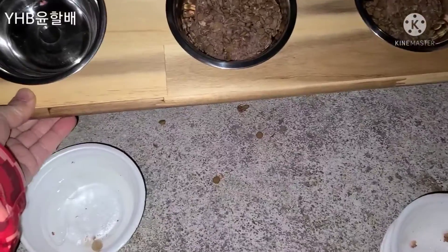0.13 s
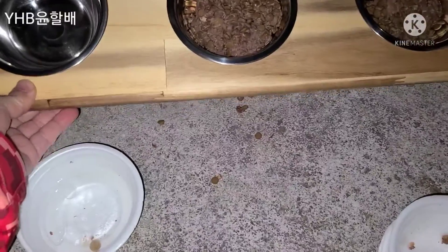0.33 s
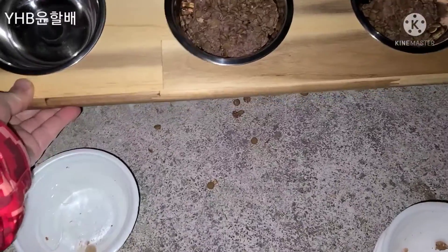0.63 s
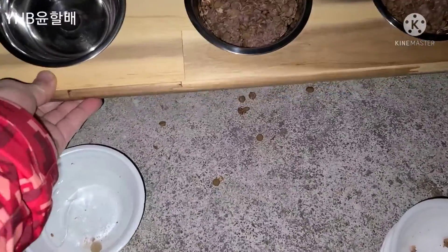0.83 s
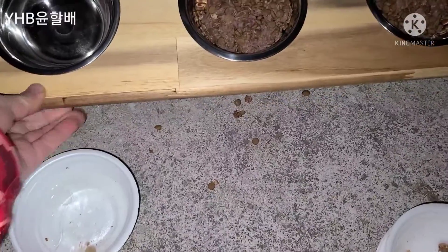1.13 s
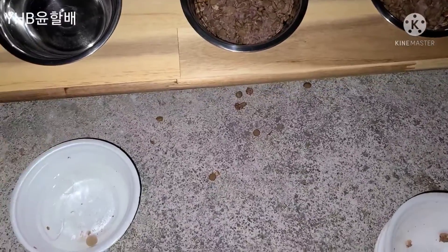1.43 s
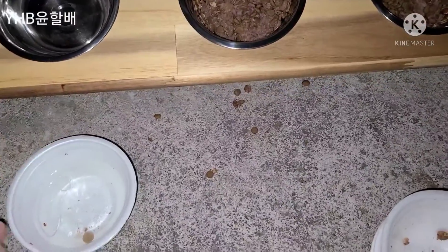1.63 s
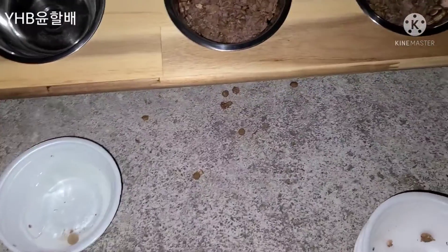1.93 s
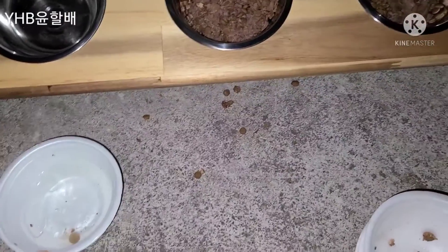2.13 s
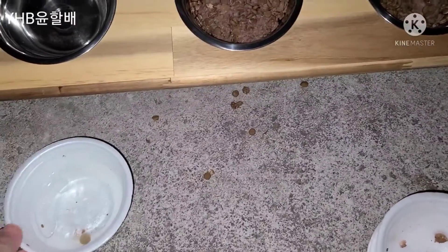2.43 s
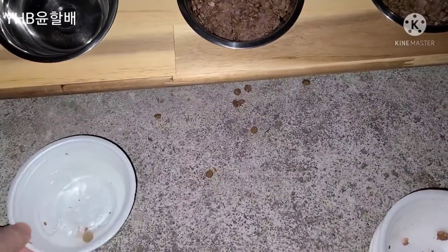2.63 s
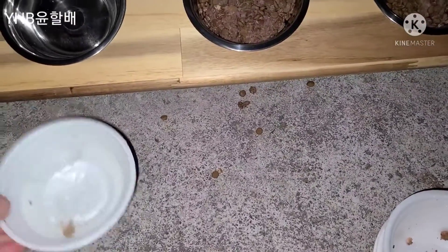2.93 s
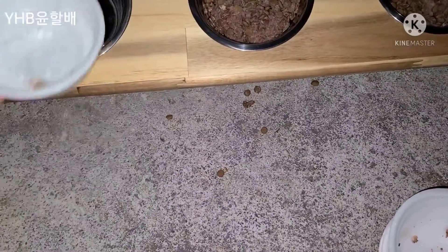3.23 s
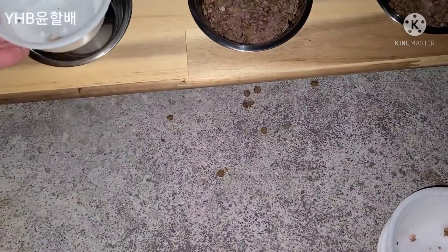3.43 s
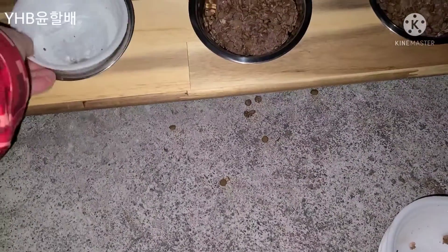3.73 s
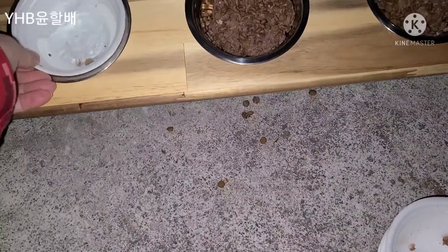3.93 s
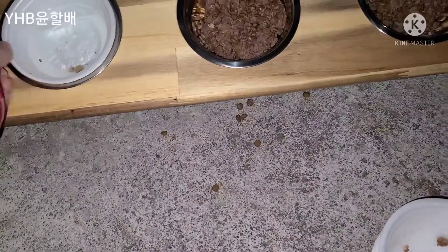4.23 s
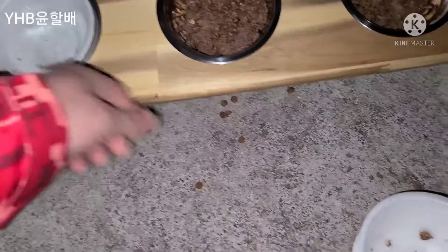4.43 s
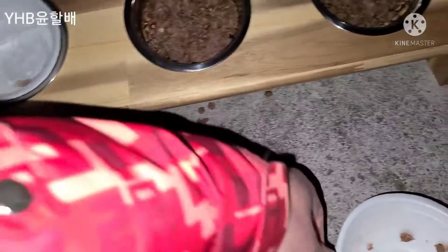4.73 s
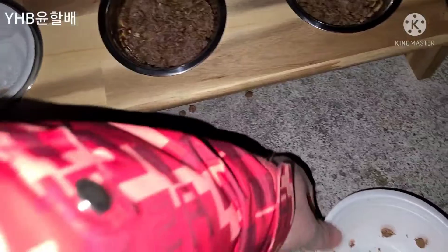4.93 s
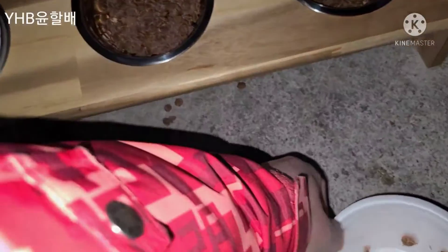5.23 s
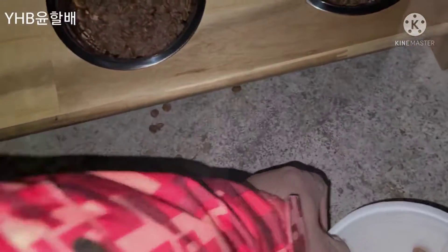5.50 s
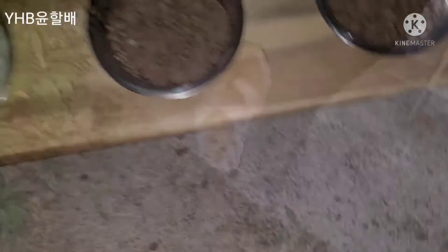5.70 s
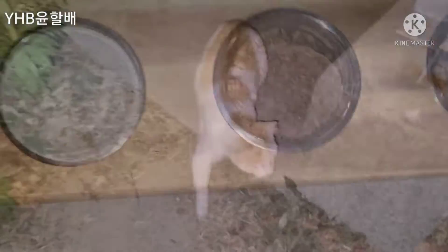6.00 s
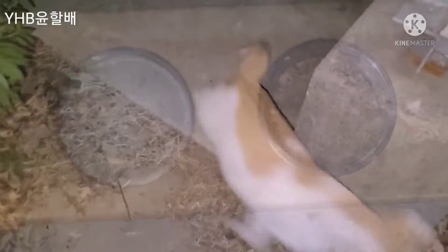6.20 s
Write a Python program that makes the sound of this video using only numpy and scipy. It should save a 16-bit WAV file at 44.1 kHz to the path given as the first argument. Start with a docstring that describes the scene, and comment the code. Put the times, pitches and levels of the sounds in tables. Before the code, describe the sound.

Close up outdoors at night, a wooden bowl stand is dragged in uneven jerks over gritty concrete, hollow and grating, loudest near one second, with a last short knock. After a lull, plastic bowls rub faintly, one taps, then bowls scuff together while being stacked. A nylon sleeve swishes broadly, followed by crisp plastic clacks and small rubs. Far low rumble and light wind buffeting lie underneath, stereo and dry.

```python
"""A wooden bowl stand is dragged in jerks over concrete, outdoors at night, close to a two-port microphone.
Light plastic bowls are then scuffed, stacked and tapped, and a nylon sleeve swishes as the arm reaches.
Far rumble and light wind lie underneath. Rubbing is made of random clicks sent through filters, knocks of
short decaying bursts, singing parts of narrow noise bands, and the night and wind of filtered noise."""
import sys
import numpy as np
from scipy import signal
from scipy.fft import rfft, irfft, next_fast_len
from scipy.io import wavfile
from scipy.ndimage import uniform_filter1d

SR = 44100
rng = np.random.default_rng(int(sys.argv[2]) if len(sys.argv) > 2 else 0)


def generate_wav(sig):
    """Save sig (samples, or channels by samples) to the path in sys.argv[1] as 16-bit PCM at SR."""
    pcm = np.round(np.clip(np.atleast_2d(sig).T, -1, 1) * 32767).astype(np.int16)
    wavfile.write(sys.argv[1], SR, pcm)


N = 280463  # length in samples
T = np.arange(N) / SR  # time in seconds
SIZE = next_fast_len(N + 4096, True)  # padded length for filtering
HZ = np.fft.rfftfreq(SIZE, 1 / SR)  # frequencies of the filters


def amp(db):
    """Turns decibels into a plain multiplier."""
    return 10 ** (np.asarray(db) / 20)


def evened(x):
    """Scales a signal to an average (RMS) strength of 1."""
    return x / np.sqrt(np.mean(x ** 2) + 1e-20)


def read(points, hz):
    """Reads a curve between its points, with pitch on a log scale."""
    point_hz, value = np.transpose(points)
    return np.interp(np.log(hz + 1), np.log(point_hz + 1), value)


def colour(x, gain):
    """Filters a signal by a gain given for each frequency in HZ."""
    return irfft(rfft(x, SIZE) * gain, SIZE)[..., :N]


def ring(modes):
    """Adds up the responses of damped modes, each row pitch in Hz, width in Hz, level in dB."""
    total = 0
    for k, (hz, width, db) in enumerate(modes):
        mode = width * HZ / (width * HZ + 1j * (HZ ** 2 - hz ** 2))
        total = total + amp(db) * mode * (-1) ** k  # neighbours have opposite signs
    return total


def strokes(rows, rise, fall):
    """Swells and fades each row by power laws; also follows the rows' last column, weighted by their power."""
    start, top, end, db = np.transpose(rows)[:4, :, None]
    t = T[::32]
    swell = np.clip((t - start) / np.maximum(top - start, 1e-3), 0, 1) ** rise
    fade = np.clip((end - t) / np.maximum(end - top, 1e-3), 0, 1) ** fall
    each = (amp(db) * swell * fade) ** 2
    power = each.sum(0)
    last_column = np.array(rows)[:, -1] @ each / (power + 1e-20)
    return np.interp(T, t, np.sqrt(power)), np.interp(T, t, last_column)


def slips(per_s, spread_db, flicker_db, flicker_s):
    """Stick-slip: random clicks of uneven size that come in clumps."""
    size = rng.standard_normal(N) * amp(spread_db * np.minimum(rng.exponential(1, N), 4))
    smooth = max(int(flicker_s * SR), 2)
    clump = uniform_filter1d(rng.standard_normal(N), smooth)
    clump = evened(uniform_filter1d(clump, smooth))
    clicks = rng.random(N) < per_s / SR
    return size * clicks * amp(flicker_db * clump)


def blows(rows, rise_s):
    """Short decaying bursts, cut after 4000 samples; rows (start s, dB, Hz, time to fall 60 dB s, noisy share)."""
    out, t = np.zeros(N + 4000), np.arange(4000) / SR
    for start, db, hz, t60, noisy in rows:
        wave = (1 - noisy) * np.sin(2 * np.pi * hz * t) + noisy * rng.standard_normal(len(t))
        at = round(start * SR)
        out[at:at + len(t)] += amp(db - 60 * t / t60) * (1 - np.exp(-t / rise_s)) * wave
    return out[:N]


def sings(rows, width_hz):
    """Each row is a narrow band of noise that swells and fades in one arch."""
    out = np.zeros(N)
    for start, end, db, hz in rows:
        at, t = round(start * SR), np.arange(0, end - start, 1 / SR)
        # two slow random signals make the tone waver in strength and phase
        pole = np.exp(-np.pi * width_hz / SR)
        a, b = signal.lfilter([1], [1, -pole], rng.standard_normal((8000, 2)).T)[:, -len(t):]
        tone = a * np.cos(2 * np.pi * hz * t) + b * np.sin(2 * np.pi * hz * t)
        arch = np.sqrt(abs(np.sin(np.pi * t / (end - start))))
        out[at:at + len(t)] += amp(db) * arch * evened(tone)
    return out


def pair(gain, same):
    """Two noises of one colour, alike by the share same."""
    a, b = rng.standard_normal((2, N))
    same = np.clip(same, -1, 1)
    return np.array([colour(a, gain), colour(a, gain * same) + colour(b, gain * np.sqrt(1 - same ** 2))])


def ports(hz, lead_ms, left_db):
    """Direct path: the left port hears the treble first, while the bass reaches both together."""
    # How the ports differ. Each row: pitch in Hz, left minus right in dB before left_db is added.
    balance = [(60, 5), (180, 0), (550, 1), (1650, -2), (4970, -10), (15000, 3)]
    lean = amp((read(balance, hz) + left_db) / 2)
    lag = 2 * np.pi * hz * lead_ms / 1000
    return np.array([lean, np.exp(-1j * lag * hz ** 2 / (hz ** 2 + 550 ** 2)) / lean])


def heard(x, lead_ms, left_db, scatter_rad, patchy_db, tilt_db):
    """Tilts a rubbing sound around 3.5 kHz, streaks its treble and scatters the treble's phase at each port."""
    hz, t, z = signal.stft(x.astype(np.float32), SR, nperseg=512, noverlap=342)
    left, right, streaks = rng.standard_normal((len(t), len(hz), 3), dtype=np.float32).T
    # smooth the random maps over pitch, then over time
    streaks = uniform_filter1d(streaks, size=2, axis=0)
    streaks = evened(uniform_filter1d(streaks, size=23, axis=1))
    scatter = uniform_filter1d(np.array([left, right]), size=4, axis=1)
    scatter = evened(uniform_filter1d(scatter, size=11, axis=2))
    treble = (hz ** 2 / (hz ** 2 + 600 ** 2))[:, None]
    scatter = scatter * scatter_rad * treble
    octaves = np.clip(np.log2((hz + 1) / 3500), -2, 2)[:, None]
    patches_db = patchy_db * treble * (streaks + 0.15 * np.maximum(streaks, 0) ** 2)
    z = z * amp(patches_db + octaves * np.interp(t, T, tilt_db)) * np.exp(1j * scatter)
    z = z * ports(hz, lead_ms, left_db)[:, :, None]
    return signal.istft(z, SR, nperseg=512, noverlap=342)[1][:, :N]


def stand():
    """Slipping feet shake the plank (low) and crush grit that rings the legs (high); jolts crush more grit."""
    # Jerks of the stand. Each row: start, hardest and end in seconds, push in dB, grit in dB beside the push.
    drags = [(-0.02, 0.0, 0.05, -34, -5), (0.043, 0.05, 0.068, -41, 2), (0.107, 0.116, 0.14, -39, -2),
             (0.362, 0.385, 0.43, -29, -2), (0.41, 0.49, 0.585, -28.5, -4.5), (0.574, 0.58, 0.63, -32, -7),
             (0.762, 0.795, 0.81, -44, -4), (0.787, 0.81, 0.91, -27, -9), (0.865, 0.895, 1.012, -23.5, -7),
             (1.134, 1.146, 1.2, -27, -12)]
    # The feet catch and jump. Each row: time in seconds, strength in dB before the short rise, pitch in Hz.
    jolt_rows = [(0.366, -17.5, 273), (0.39, -16.5, 278), (0.491, -16, 306), (0.523, -21, 325),
                 (0.544, -18.5, 370), (0.576, -20, 260), (0.602, -22, 288), (0.875, -9.5, 470),
                 (0.896, -6.5, 358), (0.908, -12, 274), (1.1366, -10, 302), (1.144, -13, 319),
                 (1.412, -26, 358)]
    # The plank's ring at the opening. Columns: start in seconds, strength in dB before the short rise,
    # pitch in Hz, time to fall 60 dB in seconds, noisy share.
    open_ring = (0, -27.5, 639, 0.14, 0)
    # Modes of the plank. Each row: pitch in Hz, width in Hz, relative level in dB.
    plank_modes = [(258.5, 35, 2), (382, 120, -1.5), (457, 59, 0), (519, 47, -2), (636, 26.6, -3),
                   (880, 60, -17), (1040, 150, -20)]
    # Colour of the crushed grit. Each row: pitch in Hz, relative level in dB per Hz.
    grit_colour = [(760, -0.5), (1300, 0.5), (1570, -5), (2240, -3), (2800, -6.5), (3280, 0), (3790, -7.5),
                   (4580, -13.5), (4990, -11), (6220, -12.5), (7050, -17), (12200, -16.5), (14300, -31),
                   (16000, -44)]
    # Modes of the legs. Each row: pitch in Hz, width in Hz, relative level in dB.
    leg_modes = [(2200, 600, 0.5), (3240, 210, 13.5), (4200, 120, -1.5), (6070, 38, 8)]
    # Narrow bands sing out of the drag. Each row: start and end in seconds, level in dB before the ports,
    # pitch in Hz.
    leg_sings = [(0.42, 0.57, -44.5, 3310), (0.79, 0.885, -42.5, 3330), (0.87, 0.925, -36.5, 6140),
                 (0.88, 0.92, -38, 4550), (0.905, 0.96, -37.5, 2304), (0.925, 0.98, -40.5, 3430),
                 (1.138, 1.18, -47, 6200), (1.17, 1.215, -58, 3050)]

    push, grit_db = strokes(drags, rise=0.6, fall=0.91)
    low_cut = HZ ** 4 / (HZ ** 4 + 230 ** 4)
    foot_slips = slips(per_s=900, spread_db=0.92, flicker_db=0.29, flicker_s=0.0071)
    plank = evened(colour(foot_slips, ring(plank_modes) * low_cut))

    crush = slips(per_s=4500, spread_db=3.2, flicker_db=1.34, flicker_s=0.0019)
    dry_grit = evened(colour(crush, amp(read(grit_colour, HZ))))
    leg_ring = evened(colour(crush, ring(leg_modes)))
    grit = evened(dry_grit + 0.61 * leg_ring)

    jolt_blows = [(s, db, hz, 0.045, 0) for s, db, hz in jolt_rows]
    jolts = blows(jolt_blows + [open_ring], rise_s=0.00077)
    press = amp(grit_db) * push + amp(-19.5) * uniform_filter1d(abs(jolts), size=130)
    scrape = heard(push * plank + press * grit, lead_ms=0.27, left_db=-2.1,
                   scatter_rad=0.97, patchy_db=2.36, tilt_db=0 * T)
    return scrape + colour(jolts + sings(leg_sings, width_hz=134), ports(HZ, lead_ms=0.376, left_db=-1.3))


def night():
    """Far traffic rumbles mostly in the bass and sinks late on; the air above stays steady; a hiss comes up."""
    # Colour of the night. Each row: pitch in Hz, relative level in dB per Hz.
    night_colour = [(59, -49), (100, 3.5), (174, -11), (343, -12), (570, -28), (991, -38), (2320, -44.5),
                    (2930, -42.5), (3470, -45.5), (5190, -47), (7610, -57.5), (9610, -51.5), (16000, -65)]
    # How alike the ports are. Each row: pitch in Hz, left-right likeness from 0 to 1.
    likeness = [(60, 0.9), (240, 0.97), (950, 0.024), (3770, 0.0081), (15000, 0.014)]
    # Strength of the rumble. Each row: time in seconds, left level in dB, taken from 150 to 500 Hz.
    rumble_level = [(0.0, -48.5), (1.7, -48.5), (5.05, -48.5), (5.35, -53), (5.9, -55.5), (6.36, -51)]
    # Hiss near 1.4 kHz towards the end. Columns: start, loudest and end in seconds, level in dB.
    late_hiss = (5.55, 5.97, 6.45, -60.5)

    low_cut = HZ ** 2 / (HZ ** 2 + 90 ** 2)
    wash = pair(amp(read(night_colour, HZ)) * low_cut, read(likeness, HZ))
    wash = wash / colour(wash[0], (HZ > 150) & (HZ < 500)).std()
    air = colour(wash, HZ ** 4 / (HZ ** 4 + 1100 ** 4))
    rumble = (wash - air) * amp(np.interp(T, *np.transpose(rumble_level)))
    hiss = evened(pair(ring([(1390, 620, 0)]) ** 2, same=0.35))
    late = hiss * strokes([late_hiss], rise=0.63, fall=0.37)[0]
    return rumble + amp(-46.0) * air + late


def wind():
    """Low lumpy pressure on both ports, strongest near 60-80 Hz; gusts buffet mostly the left port."""
    # Strength of the steady wind. Each row: time in seconds, level in dB before the small port difference.
    wind_level = [(0.0, -42.5), (1.2, -40.5), (2.5, -41.5), (4.0, -40.5), (5.1, -38.5), (5.6, -42.5),
                  (6.36, -42.5)]
    # Puffs of air. Each row: start, strongest and end in seconds, level in dB before the port gains.
    gusts = [(1.2, 1.4, 1.55, -32), (1.5, 1.58, 1.75, -33), (2.96, 3.05, 3.19, -35),
             (3.22, 3.32, 3.74, -37.5), (3.62, 3.67, 3.76, -34), (4.8, 4.92, 5.17, -34.5),
             (5.31, 5.39, 5.57, -39), (6.22, 6.29, 6.3, -37.5)]
    # Colour of a gust as modes. Each row: pitch in Hz, width in Hz, relative level in dB.
    gust_body = [(46, 36.8, -3), (77.5, 45.5, 0), (148, 85, -12.5)]

    # broad low humps: pitch in Hz, width in Hz, relative level in dB
    humps = [(40.8, 15.9, -7), (61.5, 13.36, 0.5), (74.8, 15.7, 0), (94.1, 25.2, -7)]
    lumps = evened(pair(ring(humps), same=0.98))
    steady = lumps * amp(np.interp(T, *np.transpose(wind_level)))
    buffet = evened(colour(rng.standard_normal(N), ring(gust_body)))
    buffet = buffet * strokes(gusts, rise=0.75, fall=1.0)[0]
    # port gains in dB: left, then right
    return steady * amp([[-0.6], [0.6]]) + buffet * amp([[4.5], [-14.0]])


def rubs_and_knocks():
    """Rubs hiss and ring thin walls; taps are a dent tone and dull puff, ticks treble, snaps broad cracks."""
    # Fingers and rims rub on the bowls. Each row: start, loudest and end in seconds,
    # level in dB before the final mix, tilt in dB per octave.
    rubs = [(2.503, 2.52, 2.74, -55, -0.5), (2.638, 2.658, 2.69, -47, 0.5), (2.712, 2.745, 2.8, -56, -0.5),
            (2.79, 2.83, 2.94, -53, 1), (3.69, 3.735, 3.78, -49, -1.5), (3.778, 3.81, 3.855, -43, -2.5),
            (3.84, 3.87, 3.9, -46, 0), (3.92, 3.945, 3.97, -61, 5.5), (3.995, 4.018, 4.14, -51.5, -0.5),
            (4.034, 4.048, 4.07, -44.5, -1), (4.085, 4.15, 4.2, -58, -1), (4.25, 4.282, 4.4, -57.5, -1.5),
            (5.155, 5.158, 5.172, -40, -5), (5.2, 5.22, 5.25, -42, 0), (5.236, 5.244, 5.28, -40.5, -4),
            (5.26, 5.285, 5.47, -52, -2), (5.325, 5.372, 5.57, -51.5, -3), (5.405, 5.422, 5.46, -48, -2)]
    # Colour of rubbed plastic. Each row: pitch in Hz, relative level in dB per Hz.
    plastic = [(470, -38), (800, -22), (930, -24), (1170, 3.5), (1800, 9), (2340, -6), (3140, 2),
               (4800, 10), (6300, 9), (7800, -2.5), (8770, 13), (14800, 1.5), (16000, -85)]
    # Modes of the thin walls. Each row: pitch in Hz, width in Hz, relative level in dB.
    wall_modes = [(1147, 97, 16), (1437, 81, 26.5), (1720, 88, 22), (2130, 170, 20.5), (3000, 106, 19.5),
                  (3515, 160, 22), (4110, 52, 15.5), (4960, 100, 22.5)]
    # Dull taps on bowls and stand. Each row: time in seconds, strength in dB before rise and mix,
    # dent pitch in Hz, puff strength from 0 to 1, time for the dent to fall 60 dB in seconds.
    taps = [(0.1126, -30, 545, 0.4, 0.042), (1.4125, -40.5, 954, 0, .035),
            (3.0203, -24.5, 1660, 0.14, 0.014), (3.7838, -30.5, 500, 0.4, 0.029),
            (3.8139, -27.5, 1180, 0.94, 0.043), (4.0412, -40, 1460, 1, .035),
            (4.4685, -32, 1286, 0.41, 0.013), (5.1568, -25.5, 574, 0.7, 0.053),
            (5.2405, -23.5, 1680, 0.6, 0.03), (5.2879, -29, 2201, 0.5, 0.044),
            (5.4191, -31, 1780, 0.8, 0.053), (5.72, -37.5, 1419, 0.6, .035), (6.3285, -37.5, 762, 0, 0.033)]
    # Sharp treble ticks, first from the dragged stand, later from the bowls.
    # Each row: time in seconds, strength in dB before rise and filter.
    tick_rows = [(0.0468, -28.5), (0.577, -27), (3.8132, -24), (3.855, -22.5), (3.9482, -42),
                 (4.0372, -35.5), (5.242, -25.5), (5.245, -27), (5.288, -27), (5.4426, -30), (5.516, -40)]
    # Dry snaps where an edge lands. Each row: time in seconds, strength in dB before rise and filter.
    snap_rows = [(3.0204, -33), (3.814, -29.5), (3.8688, -34), (4.0478, -38), (4.4686, -39), (5.1571, -19),
                 (5.2196, -29), (5.2408, -20.5), (5.248, -29), (5.2646, -35), (5.2766, -35), (5.42, -35)]
    # Narrow bands of noise sing out, in the bowl rubs and within the sleeve's swish.
    # Each row: start and end in seconds, level in dB before the ports, pitch in Hz.
    narrow_sings = [(2.505, 2.565, -56.5, 5030), (2.52, 2.645, -56, 2060), (2.53, 2.645, -60, 4230),
                    (2.6, 2.67, -55.5, 4750), (2.6, 2.7, -59.5, 1420), (2.8, 2.86, -55, 4100),
                    (3.7, 3.77, -59, 1781), (4.255, 4.307, -52, 1847), (4.86, 4.97, -43, 4630),
                    (5.0, 5.13, -41, 2960), (5.04, 5.11, -42, 1760), (5.335, 5.4, -49, 2850),
                    (5.435, 5.468, -49.5, 1186), (5.532, 5.566, -51, 1220)]

    gain, tilt_db = strokes(rubs, rise=0.56, fall=0.99)
    scuff = slips(per_s=9000, spread_db=2.6, flicker_db=1.7, flicker_s=0.0049)
    wall_ring = ring(wall_modes)
    hiss = evened(colour(scuff, amp(read(plastic, HZ))))
    rub = hiss + 0.81 * evened(colour(scuff, wall_ring))
    rubbing = heard(amp(1.0) * gain * rub, lead_ms=0.281, left_db=0.2,
                    scatter_rad=1.0, patchy_db=1.6, tilt_db=tilt_db)

    dents = blows([(s, db, hz, t60, 0) for s, db, hz, puff, t60 in taps], rise_s=0.00041)
    # even a tap with no puff strength gets a faint one, 0.05
    puff_rows = [(s, db + 20 * np.log10(max(puff, 0.05)), hz, 0.03, 1) for s, db, hz, puff, t60 in taps]
    puffs = blows(puff_rows, rise_s=0.0011)
    dull = ring([(1840, 2800, 0)]) ** 2
    walls = amp(3.5) * colour(puffs, dull + 0.32 * wall_ring / abs(wall_ring).max())

    ticks = blows([(s, db, 0, 0.014, 1) for s, db in tick_rows], rise_s=0.00026)
    tick_filter = HZ ** 2 / (HZ ** 2 + 2800 ** 2) / (1 + (HZ / 11000) ** 2)
    ticks = amp(0.5) * colour(ticks, tick_filter)

    snap_low_hz, snap_high_hz, snap_t60_s = 1000, 6200, 0.004
    snaps = blows([(s, db, 3000, snap_t60_s, 0.3) for s, db in snap_rows], rise_s=0.00006)
    snap_filter = HZ ** 2 / (HZ ** 2 + snap_low_hz ** 2) / (1 + (HZ / snap_high_hz) ** 6)
    snaps = amp(6.0) * colour(snaps, snap_filter)

    knocks = colour(amp(-5.0) * dents + walls + ticks, ports(HZ, lead_ms=0.214, left_db=0.15))
    knocks = knocks + colour(snaps, ports(HZ, lead_ms=0.12, left_db=3))
    singing = colour(sings(narrow_sings, width_hz=100), ports(HZ, lead_ms=0.15, left_db=0.21))
    return rubbing + knocks + singing


def sleeve():
    """Dense fine slips of the weave make a swish, loud as the sleeve drags and faint as the jacket stirs."""
    # The sleeve drags as the arm reaches out. Each row: start, loudest and end in seconds,
    # level in dB before the final 5 dB lift, tilt in dB per octave.
    reaches = [(4.685, 4.76, 4.97, -42.5, -1), (4.82, 4.93, 5.09, -36.5, -0.5), (4.97, 5.06, 5.26, -40, -2)]
    # Colour of the dragged nylon. Each row: pitch in Hz, relative level in dB per Hz.
    nylon = [(290, -11), (500, -9), (678, -12), (807, -7), (933, -6), (1460, 0), (2160, -6), (2890, 0.5),
             (3750, -5), (4730, -3.5), (7000, -11.5), (13100, -11.5), (15100, -19), (16000, -14.5)]
    # The jacket stirs faintly with each move. Each row: start, loudest and end in seconds,
    # level in dB before the final 5 dB lift, tilt in dB per octave.
    jacket = [(0.17, 0.29, 0.35, -61, -1), (1.03, 1.13, 1.32, -60, -2.5), (1.19, 1.47, 1.62, -57, -0.5),
              (1.8, 1.95, 2.6, -60, -1), (2.71, 2.9, 3.42, -65.5, -0.5), (3.28, 3.6, 3.8, -65, -1.5),
              (3.67, 3.9, 4.46, -58.5, 0), (4.3, 4.68, 4.74, -62, -1.5), (5.2, 5.35, 5.72, -59.5, 0.5),
              (5.64, 5.76, 6.18, -59.5, -2)]
    # Colour of the stirring jacket. Each row: pitch in Hz, relative level in dB per Hz.
    lining = [(590, -1), (1000, -6.5), (1730, -3), (2440, -6.5), (3010, -1.5), (3460, -5.5), (4520, -4.5),
              (7980, -12.5), (11000, -9), (14900, -16), (16000, -40)]

    gain, tilt_db = strokes(reaches, rise=0.82, fall=0.73)
    weave = slips(per_s=14000, spread_db=1.7, flicker_db=0.35, flicker_s=0.014)
    swish = evened(colour(weave, amp(read(nylon, HZ))))
    reach = heard(amp(5.0) * gain * swish, lead_ms=0.465, left_db=2.2,
                  scatter_rad=1.0, patchy_db=0.55, tilt_db=tilt_db)

    faint, faint_tilt_db = strokes(jacket, rise=0.65, fall=0.65)
    fine_weave = slips(per_s=25000, spread_db=0.88, flicker_db=0.82, flicker_s=0.037)
    stir = evened(colour(fine_weave, amp(read(lining, HZ))))
    return reach + heard(amp(5.0) * faint * stir, lead_ms=0.291, left_db=0.33,
                         scatter_rad=1.0, patchy_db=2.63, tilt_db=faint_tilt_db)


def scene():
    """Adds all the sources together, left and right."""
    return stand() + night() + wind() + rubs_and_knocks() + sleeve()


def record(dry):
    """Cuts away everything above the band limit."""
    edge_hz = 15550
    low_pass = signal.firwin(511, edge_hz, window=("kaiser", 9), fs=SR)
    return signal.oaconvolve(dry, low_pass[None], "same", axes=1)


dry = scene()
out = record(dry)
generate_wav(out)
```